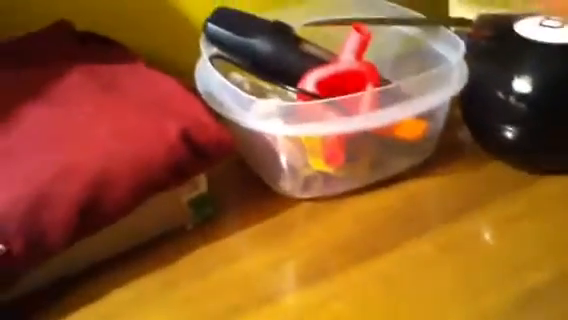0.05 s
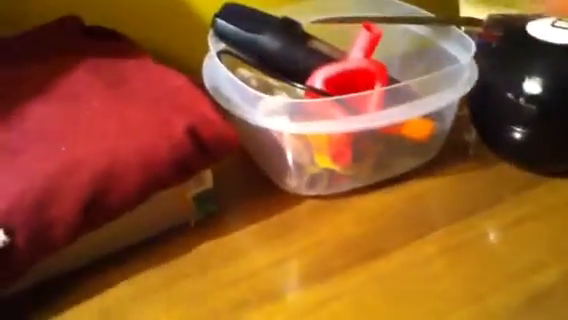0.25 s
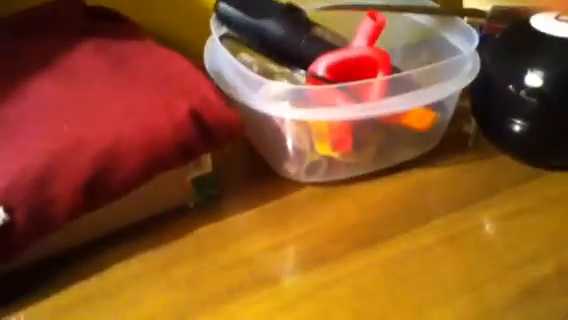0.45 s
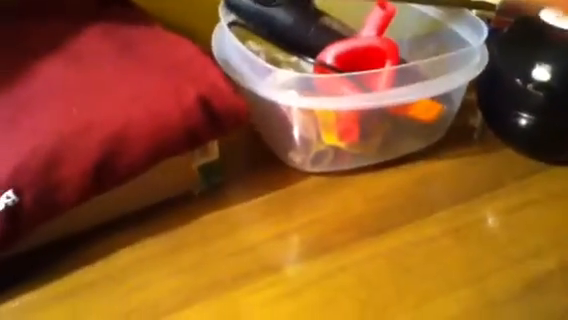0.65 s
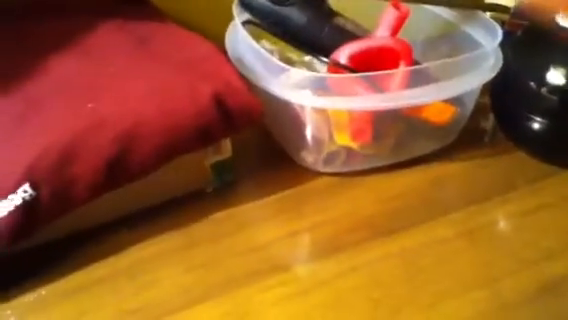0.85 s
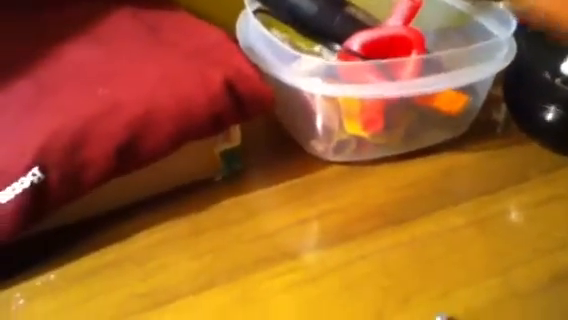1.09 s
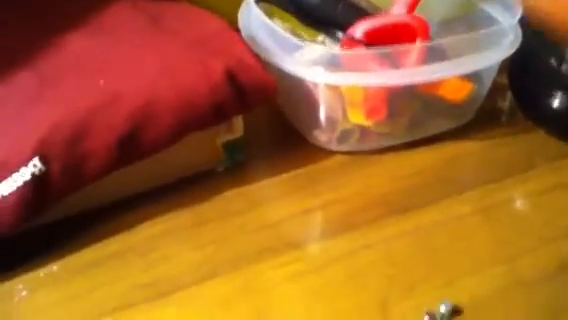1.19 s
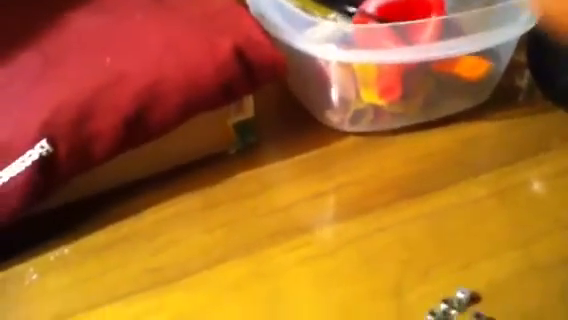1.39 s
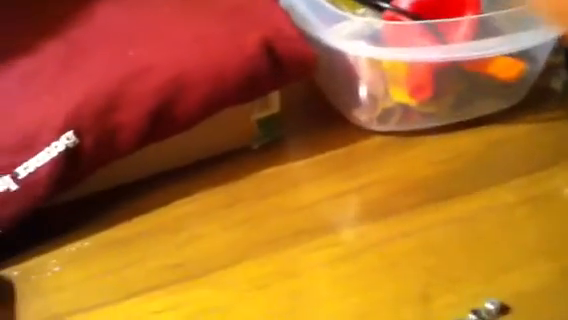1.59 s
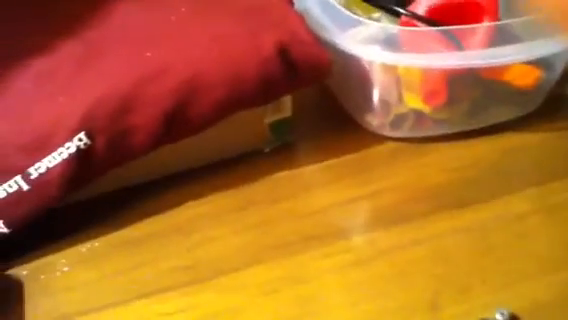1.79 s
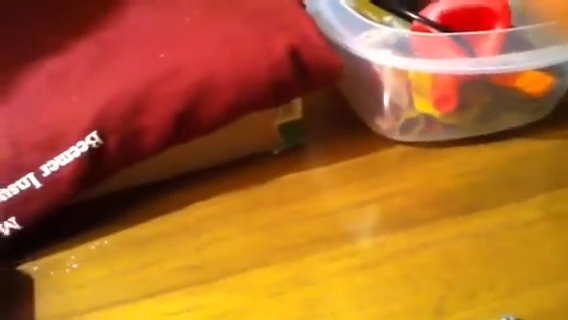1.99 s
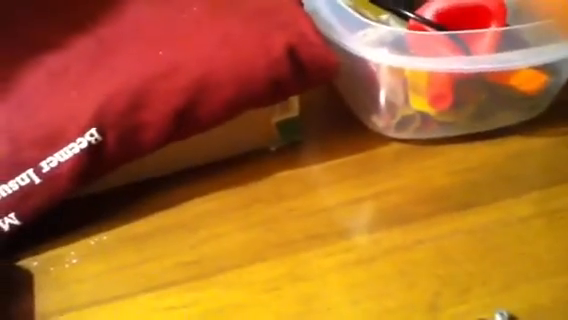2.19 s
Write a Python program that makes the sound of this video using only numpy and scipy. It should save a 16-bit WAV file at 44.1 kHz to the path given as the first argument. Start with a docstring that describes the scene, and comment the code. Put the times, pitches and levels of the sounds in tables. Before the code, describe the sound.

A small metal pellet clacks into a shell on a wooden table, then soft taps follow.

```python
"""Pellets and a shell on a wooden table

Small metal pellets and a shell are handled in a small, quiet room, over a faint rumble and hiss.
One sharp clack and its rebounds excite the damped modes of the shell and the tabletop. Soft taps and
a dull set-down follow, exciting mainly low frequencies; a brief slide on the wood gives friction noise."""
import sys
import numpy as np
from scipy import signal
from scipy.fft import rfft, irfft
from scipy.io import wavfile
from scipy.ndimage import uniform_filter1d

SR = 44100
rng = np.random.default_rng(int(sys.argv[2]) if len(sys.argv) > 2 else 0)


def waveform_to_disk(signal):
    """Save audio, clipped to [-1, 1], as 16-bit WAV at the path in sys.argv[1]."""
    frames = np.transpose(np.atleast_2d(signal))
    scaled = np.clip(frames, -1, 1) * 32767
    samples = np.round(scaled).astype(np.int16)
    wavfile.write(sys.argv[1], SR, samples)


N = 99225
T = np.arange(SR // 2) / SR  # time axis of one contact, in s

# background hiss, which dips after the clack: (t/s, level/dB)
HISS_LEVEL = [(0, -58), (0.22, -57.5), (0.45, -62), (0.7, -61), (1.0, -59.5), (2.25, -58.5)]
# spectra of the hiss and of the handling rumble: (f/Hz, relative level/dB)
HISS_SPECTRUM = [(25, -20.5), (50, -10), (90, -1.5), (150, -2), (300, -8.5), (500, -12), (800, -14.5),
                 (1500, -18), (4000, -19.5), (8000, -19.5), (12000, -22.5), (15800, -26)]
RUMBLE_SPECTRUM = [(30, -15), (85, 0.5), (180, 5), (400, -3), (650, -19), (1500, -26), (5000, -50.5),
                   (15000, -44)]
# envelope of the handling rumble: (t/s, level/dB)
RUMBLE_LEVEL = [(0, -59.5), (0.2, -68), (0.5, -65.5), (0.76, -70), (0.79, -57.5), (0.88, -58.5), (1.2, -65),
                (1.4, -62.5), (1.68, -63.5), (1.78, -67), (1.98, -57.5), (2.08, -68), (2.25, -60)]

# reflections from nearby surfaces: (delay/s, gain)
REFLECTIONS = [(.0021, .2), (.0056, 0.18), (.0078, .2), (0.0103, .16), (0.0264, .04)]
# reverberation time: (f/Hz, T60/s)
REVERB_T60 = [(200, 0.23), (500, 0.19), (1500, 0.21), (4000, 0.32), (7000, 0.25), (14000, 0.42)]
# spectrum of the reverberation: (f/Hz, level/dB)
REVERB_SPECTRUM = [(200, -3.5), (500, 0.5), (1000, -5), (2200, -7.5), (4000, -13.5), (7000, -15),
                   (14000, -17)]

# tiny rubs just before contacts: (t/s, duration/s, level/dB, centre f/Hz)
RUBS = [(0.159, 0.034, -59.5, 1700), (1.03, 0.01, -52.5, 1600), (1.048, .011, -48, 1580)]
# envelope of the slide: (t/s, level/dB)
SLIDE_LEVEL = [(1.49, -62), (1.53, -59), (1.555, -55.5), (1.575, -59), (1.598, -49.5), (1.615, -59.5),
               (1.64, -64), (1.72, -74)]
# spectrum of friction on wood: (f/Hz, relative level/dB)
SLIDE_SPECTRUM = [(100, -5), (280, 1.5), (470, 9), (680, -8), (930, 3.5), (1250, -3.5), (1550, 2),
                  (1900, -3), (3800, -8), (4700, -4), (5500, -7), (6300, -10), (8000, -11.5), (15000, -33)]

# modes of the tabletop and of the shell: (f/Hz, level/dB, T60/s)
TABLE_MODES = [(259.8, -31.5, 0.176), (298.9, -43.5, 0.27), (334, -67, 0.086), (426.6, -36, 0.12),
               (462, -48.5, 0.021), (807, -40.5, 0.041), (953, -53, 0.028), (1090, -39.5, .04),
               (1300, -41.5, .035), (1546, -39.5, 0.0397)]
SHELL_MODES = [(1955, -30, 0.057), (2240, -28.5, 0.072), (2580, -26, 0.023), (3157, -16, 0.029),
               (3430, -15, 0.026), (4170, -16.5, 0.018), (4680, -25.5, 0.021), (5500, -15.5, 0.024),
               (5820, -11, 0.0098), (5930, -41.5, .035), (6740, -22.5, 0.011), (7380, -29, 0.023),
               (7840, -33.5, 0.039), (9990, -28, 0.015)]
# hollow resonances of the shell knocking on wood: (f/Hz, level/dB)
HOLLOW_MODES = [(984, -35), (1321, -39), (1650, -37), (2090, -34), (2240, -36), (2414, -38)]
# spectra of the noisy contact transients: (f/Hz, level/dB)
KNOCK_SPECTRUM = [(60, -35), (170, -13), (280, 13.5), (450, 7), (680, -14), (900, 0), (1550, -2),
                  (2600, -17.5), (6300, -19), (14000, -44)]
TICK_SPECTRUM = [(100, -30), (900, -21), (2200, 5), (3200, 0.5), (5200, -1.5), (6300, -3), (8000, -10),
                 (15000, -21)]
CRACK_SPECTRUM = [(100, -28), (380, -9), (680, -19), (1100, -11), (2000, -1), (3300, 4), (4300, 2),
                  (5800, 3), (7200, -6), (11500, -10), (14000, -20), (15800, -38)]
CLATTER_SPECTRUM = [(100, -24), (700, -17), (1000, 0.5), (1600, 6), (2400, 1.5), (3200, -8.5), (6000, -24),
                    (15000, -35)]

# soft contacts on the table: (t/s, ring/dB, thud/dB, knock/dB, tick/dB, cut-off f/Hz)
SOFT_IMPACTS = [(0.911, -21, -57, -35, -43, 880), (0.939, -26, -42, -28, -45, 900),
                (0.97, -30, -54, -31, -56, 497), (1.005, -19, -49, -32.5, -45, 600),
                (1.05, -2, -31.5, -16, -28, 880), (1.0957, 1, -44, 0.5, -20, 2340),
                (1.1239, -2, -44, -3.5, -26.5, 1700), (1.1473, -4.5, -30.5, -16, -27.5, 696),
                (1.21, -27, -41, -30, -49, 500), (1.272, -19.5, -47, -19.5, -37, 550),
                (1.4835, -3, -31.5, -10, -21, 1020), (1.493, -20, -38.5, -8.5, -25, 2050),
                (1.761, -29, -66, -36, -43, 1990)]
# a pellet's edge striking the shell: (t/s, level/dB)
EDGE_IMPACTS = [(0.3015, -30), (0.3204, -20)]
# the clack and its rebounds: (t/s, crack/dB, shell/dB, table/dB, clatter/dB, hollow/dB, tilt/(dB/octave))
HARD_IMPACTS = [(0.2381, 7, -27, 5.5, -16, -11, 1.5), (0.2394, -1, 0.5, -9.5, 0, -39, 2.5),
                (0.2968, -6, -23.5, -7, -1, -0.5, 1.5), (0.3037, -12, -23, -17, -11.5, -1.5, 4.5),
                (0.3207, -12, -29, -14.5, -3, -1, 2)]


def amp(db):
    """Amplitude ratio of a level in decibels."""
    return 10 ** (np.asarray(db) / 20)


def unit_rms(x):
    """Normalisation to unit mean power."""
    return x / np.sqrt(np.mean(x ** 2) + 1e-20)


def at_frequency(points, hz):
    """Interpolation along a logarithmic frequency axis."""
    f, value = np.transpose(points)
    return np.interp(np.log(hz + 1), np.log(f + 1), value)


def envelope(points):
    """Amplitude envelope, linear in decibels between (t/s, level/dB) points."""
    return amp(np.interp(np.arange(N) / SR, *np.transpose(points)))


def add(mix, start, sound):
    """Superposition of a sound on the mix from a starting time in seconds."""
    part = mix[max(round(start * SR), 0):][:len(sound)]
    part += sound[:len(part)]


def colour(x, gain_db):
    """Minimum-phase filtering: the phase follows from gain_db(f) by the Hilbert transform."""
    log_gain = np.log(amp(gain_db(abs(np.fft.fftfreq(4096, 1 / SR)))))
    response = np.fft.ifft(np.exp(np.conj(signal.hilbert(log_gain)))).real
    return signal.fftconvolve(x, response[:len(response) // 2])[:len(x)]


def decay(t60):
    """Exponential damping by 60 dB in t60 seconds."""
    return np.exp(-np.log(1000) * T / t60)


def mode(hz, t60):
    """Free vibration of a damped oscillator."""
    return decay(t60) * np.sin(2 * np.pi * hz * T)


def ring(modes):
    """Modal superposition: each mode of a struck body decays at its own rate."""
    return sum(amp(db) * mode(hz, t60) for hz, db, t60 in modes)


def burst(spectrum, t60):
    """Broadband impact transient: decaying noise, whitened and then given a spectrum."""
    bins = rfft(rng.standard_normal(len(T)) * decay(t60))
    bins /= np.sqrt(uniform_filter1d(abs(bins) ** 2, size=200))
    white = np.roll(irfft(bins, len(T)), 8)  # a short delay keeps the onset whole
    return colour(white * (T < T[-1] / 2), lambda hz: at_frequency(spectrum, hz))


def noise(spectrum):
    """Stationary noise by spectral weighting of white noise."""
    gain = amp(at_frequency(spectrum, np.fft.rfftfreq(N, 1 / SR)))
    return unit_rms(irfft(rfft(rng.standard_normal(N)) * gain, N))


def background():
    """Slow amplitude modulation of two noises: the low rumble of handling and a faint hiss."""
    rumble = noise(RUMBLE_SPECTRUM) * envelope(RUMBLE_LEVEL)
    hiss = noise(HISS_SPECTRUM) * envelope(HISS_LEVEL)
    return rumble + hiss


def room(x, build_up_s=0.011):
    """Reverberation: early reflections and a diffuse field whose decay depends on frequency."""
    hz, t, bands = signal.stft(rng.standard_normal(len(T)), SR, nperseg=256)
    bands *= np.exp(-np.log(1000) * t / at_frequency(REVERB_T60, hz)[:, None])
    diffuse = signal.istft(bands, SR, nperseg=256)[1][:len(T)]
    bins = rfft(diffuse * np.minimum(T / build_up_s, 1))
    power = uniform_filter1d(uniform_filter1d(abs(bins) ** 2, size=40), size=40)
    bins /= np.sqrt(power + 1e-12)  # whitened, the tail has no strong tones of its own
    bins *= amp(at_frequency(REVERB_SPECTRUM, np.fft.rfftfreq(len(T), 1 / SR)))
    response = irfft(bins, len(T)) * (T < T[-1] * 3 / 4)
    for delay, gain in REFLECTIONS:
        add(response, delay, np.array([gain]))
    return signal.fftconvolve(x, response)[:N]


def scuffs(half_width_octaves=0.16):
    """Friction in a brief rub gives a swell of narrow-band noise."""
    out = np.zeros(N)
    hz = np.fft.rfftfreq(len(T), 1 / SR)
    for start, duration, db, centre_hz in RUBS:
        band = 1 / (1 + (np.log2((hz + 1) / centre_hz) / half_width_octaves) ** 2)
        rub = irfft(rfft(rng.standard_normal(len(T))) * band)
        n = round(duration * SR)
        add(out, start, amp(db) * unit_rms(rub[:n]) * np.hanning(n))
    return out


def slide(grain_db=2):
    """Sliding friction on wood: noise made grainy by rapid random amplitude modulation."""
    t = np.arange(N) / SR
    grain = amp(grain_db * unit_rms(uniform_filter1d(rng.standard_normal(N), size=80)))
    friction = colour(grain * rng.standard_normal(N), lambda hz: at_frequency(SLIDE_SPECTRUM, hz))
    moving = (t > SLIDE_LEVEL[0][0]) & (t < SLIDE_LEVEL[-1][0])
    return unit_rms(friction) * envelope(SLIDE_LEVEL) * moving


def thud():
    """The tabletop yields under a contact and springs back in a quickly damped low vibration."""
    return mode(hz=315, t60=0.05)


def taps():
    """A compliant contact is a low-pass filter: the softer the tap, the duller the tabletop sounds."""
    out = np.zeros(N)
    table = ring(TABLE_MODES)
    for start, ring_db, thud_db, knock_db, tick_db, cutoff_hz in SOFT_IMPACTS:
        knock = amp(knock_db) * burst(KNOCK_SPECTRUM, t60=0.021)
        wood = amp(ring_db) * table + amp(thud_db) * thud() + knock
        dulled = colour(wood, lambda hz: -10 * np.log10(1 + (hz / cutoff_hz) ** 2))
        tick = amp(tick_db) * burst(TICK_SPECTRUM, t60=0.023)
        add(out, start, dulled + tick)
    return out


def pings():
    """A pellet's edge on the shell excites one high, short-lived mode."""
    out = np.zeros(N)
    for start, db in EDGE_IMPACTS:
        add(out, start, amp(db) * mode(hz=6160, t60=0.012))
    return out


def clacks():
    """Impulsive excitation: metal strikes the shell, and shell and tabletop crack, clatter and ring."""
    out = np.zeros(N)
    shell = ring(SHELL_MODES)
    hollow = sum(amp(db) * mode(hz, t60=0.045) for hz, db in HOLLOW_MODES)
    table = ring(TABLE_MODES) + amp(-27) * thud()
    for start, crack_db, shell_db, table_db, clatter_db, hollow_db, tilt in HARD_IMPACTS:
        crack = amp(crack_db) * burst(CRACK_SPECTRUM, t60=0.017)
        strike = crack + amp(shell_db) * shell
        brightened = colour(strike, lambda hz: tilt * np.log2((hz + 500) / 5000))
        clatter = amp(clatter_db) * burst(CLATTER_SPECTRUM, t60=0.042)
        add(out, start, brightened + clatter + amp(table_db) * table + amp(hollow_db) * hollow)
    return out


def scene(bass_cutoff_hz=276):
    """Direct and reverberant sound of the contacts, superposed on the background."""
    hard = clacks()
    bright = pings()
    soft = taps() + slide() + scuffs()
    reverberant = room(amp(-2.5) * hard + amp(-6) * bright + amp(-4) * soft)
    # the microphone's high-pass thins the bass of the contacts
    high_pass = signal.butter(4, bass_cutoff_hz, "high", fs=SR, output="sos")
    contacts = signal.sosfilt(high_pass, hard + bright + soft + reverberant)
    return (contacts + background())[None]


def record(dry, cutoff_hz=15900):
    """Band limiting: a linear-phase low-pass filter removes the highest treble."""
    low_pass = signal.firwin(511, cutoff_hz, window=("kaiser", 9), fs=SR)
    return signal.oaconvolve(dry, low_pass[None], "same")


dry = scene()
out = record(dry)
waveform_to_disk(out)
```